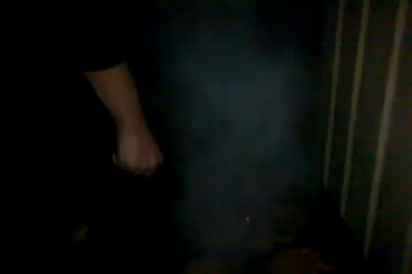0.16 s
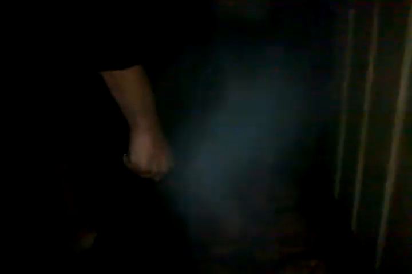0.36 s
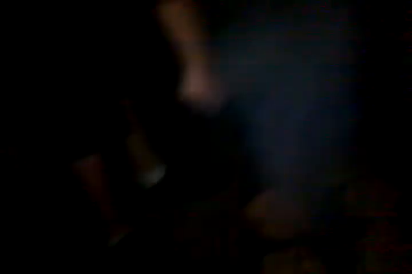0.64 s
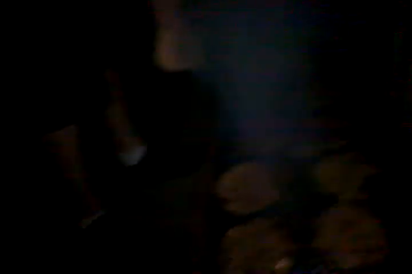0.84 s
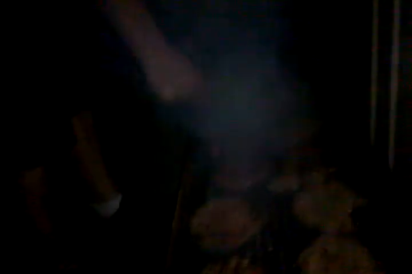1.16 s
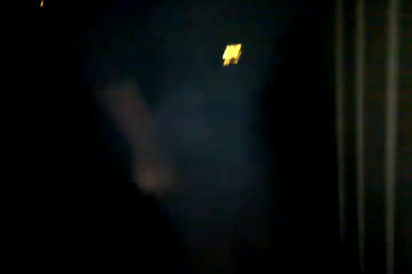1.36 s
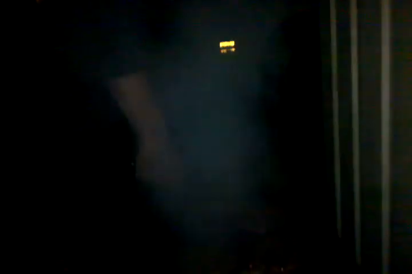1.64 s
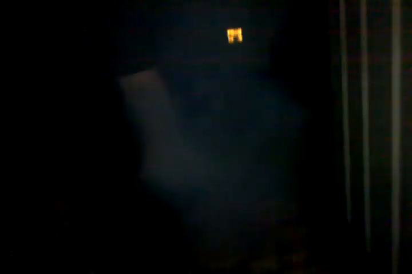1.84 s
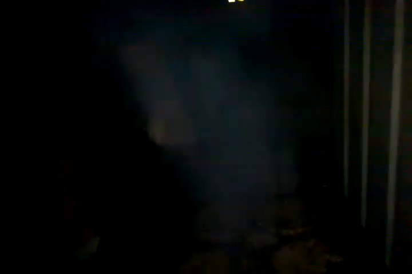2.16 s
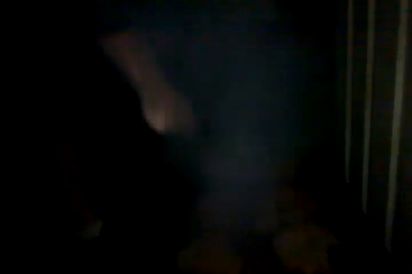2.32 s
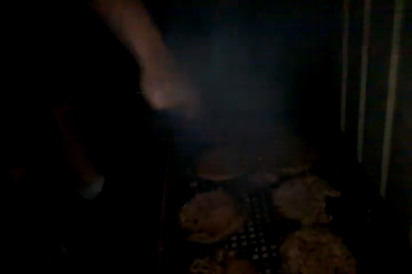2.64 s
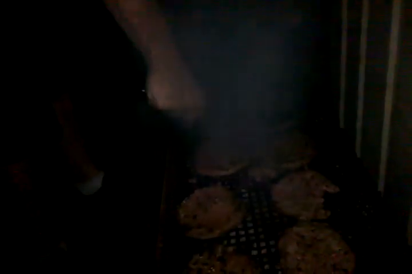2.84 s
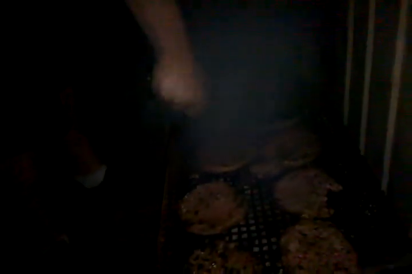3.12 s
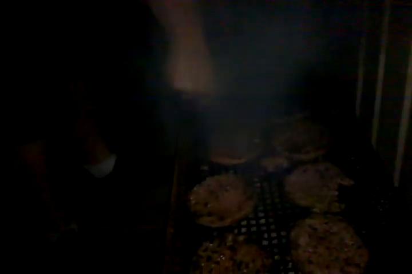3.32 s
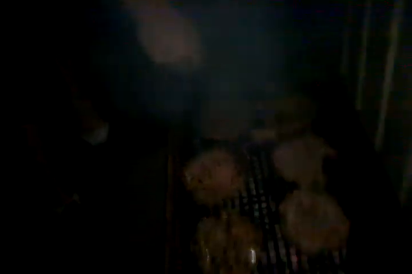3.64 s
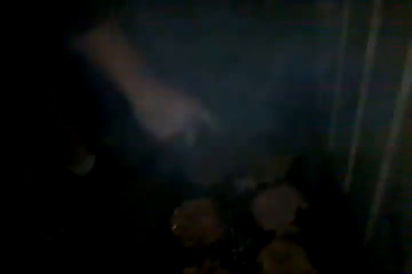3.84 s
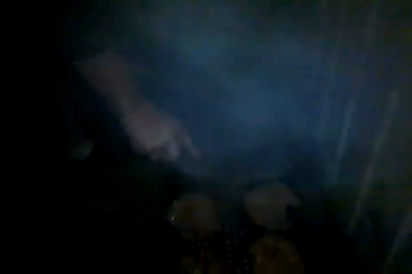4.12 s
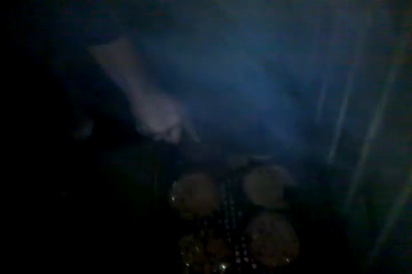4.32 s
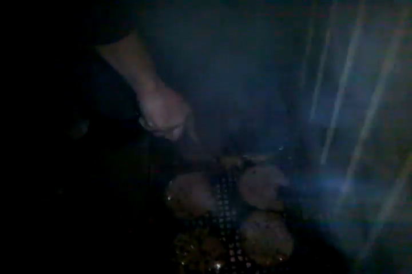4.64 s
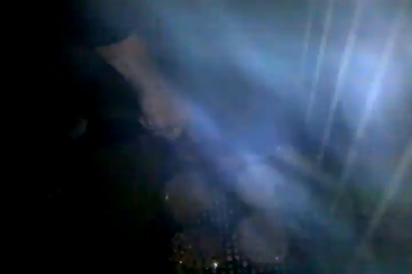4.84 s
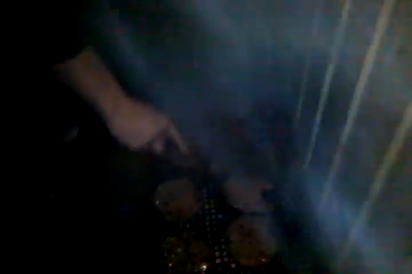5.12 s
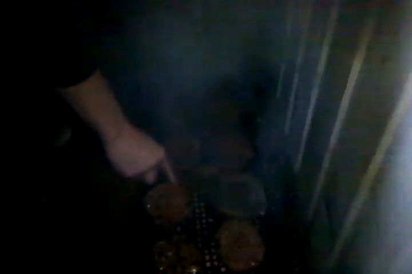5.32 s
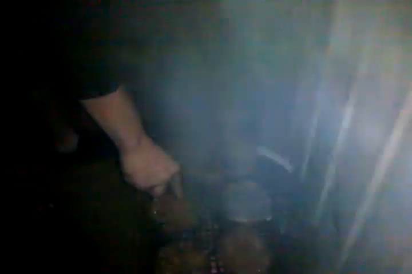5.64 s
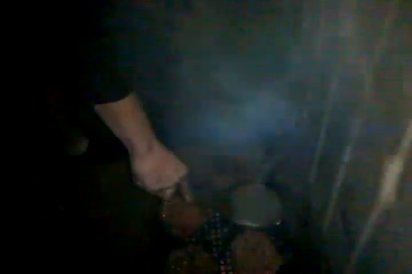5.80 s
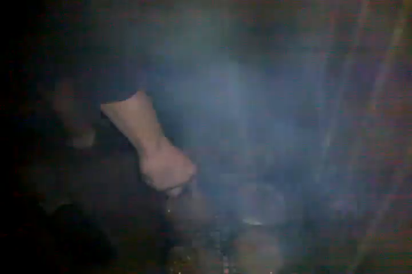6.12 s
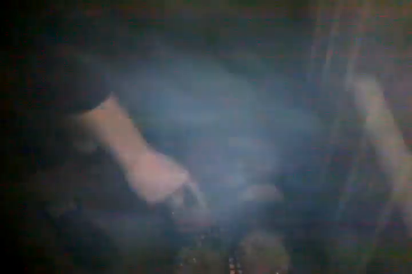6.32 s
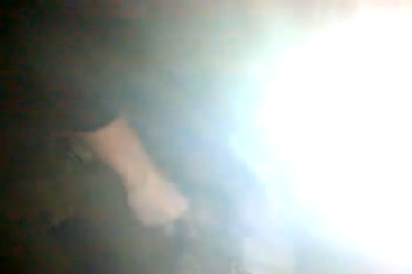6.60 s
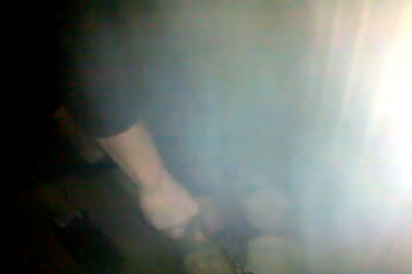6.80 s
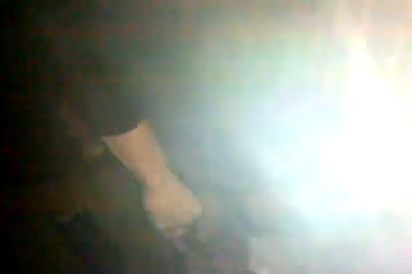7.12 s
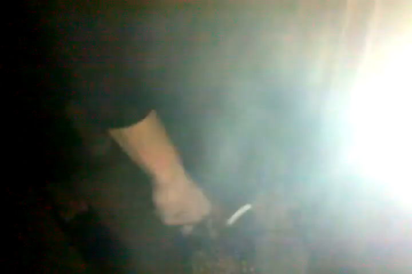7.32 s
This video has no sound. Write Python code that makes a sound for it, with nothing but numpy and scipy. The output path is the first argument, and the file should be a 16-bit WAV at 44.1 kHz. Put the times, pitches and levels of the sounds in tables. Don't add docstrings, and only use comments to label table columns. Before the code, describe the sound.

Meat patties fry on an outdoor grill at night, a dense bright sizzle of tiny crackles and steam hiss with sharp fat spits throughout. Soft dull knocks come now and then. Past the middle a metal turner clinks once, then about a second later rattles briefly on the grate. A faint low rumble lies beneath. One close, small narrow-band microphone, dry and open, with slightly shifting tone.

```python
import sys
import numpy as np
from scipy import signal
from scipy.fft import rfft, irfft
from scipy.io import wavfile
from scipy.ndimage import uniform_filter1d, map_coordinates

SR = 44100
rng = np.random.default_rng(int(sys.argv[2]) if len(sys.argv) > 2 else 0)


def decibels_to_gain(level_db):
    exponent = np.asarray(level_db, float) / 20
    return 10 ** exponent


def digitize_waveform(pressure):
    field = np.atleast_2d(pressure).T
    bounded = np.clip(field, -1, 1)
    quanta = np.round(bounded * 32767).astype(np.int16)
    wavfile.write(sys.argv[1], SR, quanta)


N = 329118

# (time [s], level [dB], dull side of the hiss against the bright [dB])
FRYING = [(0.0, -37.5, -0.5), (0.39, -37, -1), (0.7, -35, -1), (1.18, -35.5, 0), (1.66, -37.5, 0.5),
          (2.01, -36.5, -1), (2.66, -35.5, -0.5), (3.57, -39, -0.5), (4.17, -38, 0), (4.82, -40.5, -0.5),
          (5.38, -40.5, -0.5), (6.31, -38.5, -1.5), (6.77, -40.5, -0.5), (7.06, -39.5, -2.5),
          (7.25, -38, -1.5), (7.46, -37, -2.5)]


def rms_one(x):
    return x / np.sqrt(np.mean(x ** 2) + 1e-20)


def in_time(rows):
    s, *columns = np.transpose(rows)
    return [np.interp(np.arange(N) / SR, s, column) for column in columns]


def at_hz(points, hz):
    point_hz, value = np.array(points).T
    return np.interp(np.log(hz), np.log(point_hz), value)


def colour(x, points, size=8192):
    bin_hz = np.arange(1, size // 2 + 2) * SR / size
    cepstrum = irfft(np.log(decibels_to_gain(at_hz(points, bin_hz))))
    cepstrum[1:size // 2] *= 2
    cepstrum[size // 2 + 1:] = 0
    impulse = irfft(np.exp(rfft(cepstrum)))
    return signal.fftconvolve(x, impulse)[:N]


def drift(rate):
    r = np.exp(-40 * np.pi * rate / SR)
    chance = rng.standard_normal(N // 20 + 3002)
    slow = signal.lfilter([1], [1, -2 * r, r * r], chance)[3000:]
    return np.interp(np.arange(N) / 20, np.arange(len(slow)), rms_one(slow - slow.mean()))


def ring(clicks, hz, t60):
    r, w = decibels_to_gain(-60 / (t60 * SR)), 2 * np.pi * hz / SR
    return signal.lfilter([0, np.sin(w)], [1, -2 * r * np.cos(w), r * r], clicks + 1e-18)


def vigour():
    level_db = in_time(FRYING)[0]
    return level_db - level_db.mean()


def rumble():
    # (frequency [Hz], density [dB per Hz])
    traffic_band = [(18, -60.5), (30, -37.5), (65, -18.5), (86, -7), (109, 1), (130, 5), (183, 0),
                    (230, -5), (300, -21.5), (510, -120)]
    # (frequency [Hz], density [dB per Hz])
    draught_band = [(120, -31), (200, -15), (231, -0.5), (286, -5), (405, -0.5), (579, -4.5), (900, -11),
                    (1170, -41), (1980, -120)]
    heave_db = 1.9
    traffic, draught = (rms_one(colour(rng.standard_normal(N), band)) for band in (traffic_band, draught_band))
    traffic_db = -61 + heave_db * drift(3.0)
    draught_db = -58 + .5 * vigour() + .5 * heave_db * drift(1.6)
    return decibels_to_gain(traffic_db) * traffic + decibels_to_gain(draught_db) * draught


def thuds():
    # (time [s], peak [dB], pitch [Hz], t60 [s])
    knocks = [(0.218, -34.5, 433, 0.023), (.77, -42, 432, 0.057), (1.5, -40, 343, 0.028),
              (1.905, -26.5, 430, 0.014), (4.14, -34.5, 450, 0.023), (5.4152, -29, 1000, .006),
              (5.545, -43, 397, 0.042), (5.55, -58, 620, 0.039), (6.495, -47, 265, 0.074),
              (6.507, -40, 342, 0.13), (6.586, -43.5, 194, 0.25), (7.276, -44, 316, 0.072),
              (7.275, -53, 430, 0.053), (7.38, -50, 161, .1)]
    out = np.zeros(N)
    for s, db, hz, t60 in knocks:
        start = round(s * SR)
        t = np.arange(min(round(t60 * SR), N - start)) / SR
        shape = (1 - np.exp(-t * hz * 1.9)) * decibels_to_gain(-60 * t / t60)
        out[start:][:len(t)] += decibels_to_gain(db - 3) * shape * np.sin(2 * np.pi * hz * t)
    return out


def strike(taps, modes, scratch_db, scratch_s, rattle_db, rattle_s):
    # (frequency [Hz], level [dB])
    scratch_colour = [(200, -19), (1500, -18.5), (4000, 5.5)]
    # (frequency [Hz], level [dB])
    rattle_colour = [(120, -30), (260, -3), (900, -3), (2200, -4), (4500, -12)]
    s, hit_db = np.transpose(taps)
    touch = np.zeros(N)
    touch[np.round(s * SR).astype(int)] = decibels_to_gain(hit_db)
    out = np.zeros(N)
    for k, (hz, db, t60) in enumerate(modes):
        out += (-1) ** k * decibels_to_gain(db - 7) * ring(touch, hz, t60)
    for db, fade_s, shape in ((scratch_db, scratch_s, scratch_colour), (rattle_db, rattle_s, rattle_colour)):
        fade = signal.lfilter([1], [1, -np.exp(-1 / (fade_s * SR))], touch)
        out += decibels_to_gain(db) * colour(fade * rng.standard_normal(N), shape)
    return out


def turner():
    # (time [s], peak [dB])
    free_taps = [
        (5.5418, -25),
        (5.5452, -13),
    ]
    # (time [s], peak [dB])
    held_taps = [
        (6.471, -24),
        (6.4895, -20),
        (6.4958, -16.5),
        (6.503, -27),
        (6.511, -29),
    ]
    # (frequency [Hz], level [dB], t60 [s])
    free_modes = [(900, -38, .07), (1510, -24, .1), (2130, -24, .05), (2600, -7, .025), (3225, -12, .085),
                  (3990, -1, .035), (4400, -3, .025), (5450, 0, .032), (6400, -8, .02)]
    # (frequency [Hz], level [dB], t60 [s])
    held_modes = [(1520, -26, .07), (2130, -24, .05), (2800, -5, .022), (3900, -13, .015), (4550, 2, .02),
                  (5300, -7, .015), (6500, -4, .012)]
    clink = strike(free_taps, free_modes, scratch_db=-6, scratch_s=.0025, rattle_db=-15.5, rattle_s=.02)
    rattle = strike(held_taps, held_modes, scratch_db=-17, scratch_s=.004, rattle_db=-17, rattle_s=.015)
    return clink + rattle


def small_drops():
    when, size, pitch, low = rng.random((56, 4)).T
    at = (when * (N - 1)).astype(int)
    db = -24.5 + vigour()[at] - 0.2 * (2 * size - 1)
    low_db = -28.5 + 2.5 * (2 * low - 1)
    return list(zip(at / SR, db, 4400 + 2400 * pitch, low_db))


def spits():
    # (time [s], peak [dB], pitch [Hz], low part [dB])
    big_drops = [(0.0527, -24.5, 5960, -23), (0.0755, -12, 5920, -39), (0.3446, -22.5, 4380, -27),
                 (0.6509, -24, 5700, -21), (0.6759, -21.5, 4370, -16), (0.2168, -30, 3000, -5),
                 (1.3229, -17, 6650, -21), (1.4624, -18.5, 6000, -20), (1.4696, -28, 5550, -16),
                 (1.492, -18, 5220, -24), (1.9001, -17, 6200, -35), (2.0507, -24.5, 6840, -25),
                 (2.5358, -25.5, 6500, -36), (2.5591, -16.5, 3860, -23), (2.6966, -17.5, 6100, -29),
                 (3.4281, -22, 5600, -35), (4.1394, -21, 5260, -15), (4.2068, -22.5, 3620, -24),
                 (4.2243, -21.5, 5920, -28), (4.7127, -16.5, 6200, -26), (4.722, -21, 4300, -17),
                 (4.722, -11.5, 6960, -29), (4.7566, -29, 4180, -18), (4.7698, -20.5, 4930, -14),
                 (4.8803, -23.5, 5760, -29), (5.1911, -23.5, 3920, -25), (5.3588, -21.5, 6000, -33),
                 (5.4148, -17.5, 5370, -15), (6.8364, -23, 6090, -31), (7.0589, -24, 4600, -12.5)]
    drops = big_drops + small_drops()
    out, t = np.zeros(N + 900), np.arange(800) / SR
    treble = signal.butter(2, [3700, 9500], "band", fs=SR, output="sos")
    low = signal.butter(3, [1400, 3600], "band", fs=SR, output="sos")
    for (s, db, hz, low_db), noise in zip(drops, rng.standard_normal((len(drops), 800))):
        splash = .32 * noise * np.exp(-t / .0009) + .12 * noise[::-1] * np.exp(-t / .003)
        crack = (t == 0) * 2 + splash
        tone = .45 * np.sin(2 * np.pi * hz * t) * np.exp(-t * hz / 3)
        bright = signal.sosfilt(treble, crack + tone)
        dull = signal.sosfilt(low, crack)
        drop = bright / np.abs(uniform_filter1d(bright, 3)).max()
        drop = drop - decibels_to_gain(low_db + 5) * dull / np.abs(dull).max()
        out[round(s * SR) + 45:][:800] += decibels_to_gain(db - 1.5) * drop
    return out[:N]


def bursts(per_s, spread_db, clump_db, cycles):
    sizes = decibels_to_gain(spread_db * np.minimum(rng.exponential(1, N), 4.5)) * rng.choice([-1, 1], N)
    surge = drift(14)
    surge = surge - uniform_filter1d(surge, size=SR // 5)
    clumps = decibels_to_gain(clump_db * (surge + .7 * drift(70)))
    born = rng.random(N) < per_s * clumps / SR
    pitches = np.geomspace(1000, 8000, 14)
    dealt = rng.integers(0, len(pitches), N)
    rings = (ring(sizes * born * (dealt == k), hz, cycles / hz) for k, hz in enumerate(pitches))
    return rms_one(colour(sum(rings), [(600, -2.5), (2000, 0.0), (8000, 5.5)]))


def by_band(x, gains):
    centre_hz = [1200, 2600, 4200, 6000]
    spectrum, hz = rfft(x), np.maximum(np.arange(N // 2 + 1), 1) * SR / N
    shares = (at_hz(list(zip(centre_hz, row)), hz) for row in np.eye(len(centre_hz)))
    return sum(g * irfft(spectrum * share, N) for g, share in zip(gains, shares))


def sizzle():
    # (frequency [Hz], density [dB per Hz])
    surface_colour = [(350, -41.5), (600, -19), (1000, -18.5), (1400, -17.5), (2000, -11.5), (2500, -10.5),
                      (3200, -2.5), (3800, -0.5), (4600, 2), (5500, 2.5), (6600, 4), (7000, 2)]
    follows_vigour = [0.99, .95, .95, 1.14]
    follows_dull = [2.4, .5, .1, -0.65]
    dull_db = in_time(FRYING)[1]
    dull_swing = dull_db - dull_db.mean()
    band_db = [v * vigour() + d * dull_swing + 0.18 * drift(2.0) for v, d in zip(follows_vigour, follows_dull)]
    burst_share = np.clip(0.49 + 0.12 * drift(1.5), 0, 1)
    steam = rng.standard_normal(N) * decibels_to_gain(0.14 * drift(12))
    bubbles = bursts(per_s=5000, spread_db=2.0, clump_db=2.2, cycles=3.1)
    fizz = colour(np.sqrt(burst_share) * bubbles + np.sqrt(1 - burst_share) * steam, surface_colour)
    return decibels_to_gain(-34) * by_band(rms_one(fizz), [decibels_to_gain(db) for db in band_db])


def pan_bounce(x):
    # (time [s], extra path [ms], strength [0-1])
    bounce_path = [
        (0, .757, 0.19),
        (.9, 0.713, 0.03),
        (2, .85, 0),
        (3.4, .89, 0.12),
        (4.6, 0.812, 0.07),
        (6.3, 0.772, 0.08),
        (6.9, .435, 0.06),
        (7.46, .435, 0.18),
    ]
    lag_ms, strength = in_time(bounce_path)
    late = map_coordinates(x, [np.arange(N) - lag_ms * SR / 1000], order=3)
    return x + strength * late


def scene():
    frying = pan_bounce(sizzle() + spits())
    return (frying + turner() + thuds() + rumble())[None]


def top_cut(x):
    return signal.sosfilt(signal.butter(12, 9110, fs=SR, output="sos"), x)


def record(dry):
    # (frequency [Hz], level [dB])
    mic_path = [(20, -30), (60, -3), (100, 0), (6800, 0), (7000, -3.5), (7300, -11.5), (7600, -22),
                (7900, -32), (8100, -40), (8400, -54), (20000, -90)]
    # (frequency [Hz], level [dB])
    image_path = [(20, -90), (7700, -30), (7950, 0), (8100, -3.5), (8400, -11), (8700, -23), (9000, -37),
                  (9300, -50), (20000, -120)]
    capture_hz = 16000
    band = colour(dry[0], mic_path)
    carrier = 2 * np.cos(2 * np.pi * capture_hz * np.arange(N) / SR)
    mirror = colour(band * carrier, image_path)
    return top_cut((band + mirror)[None])


dry = scene()
out = record(dry)
digitize_waveform(out)
```